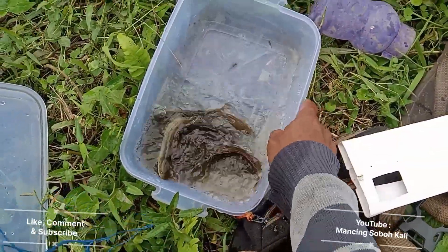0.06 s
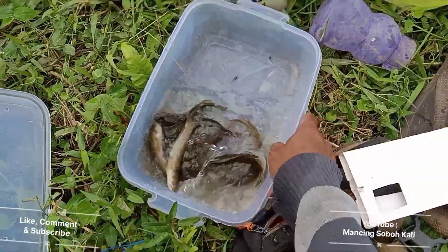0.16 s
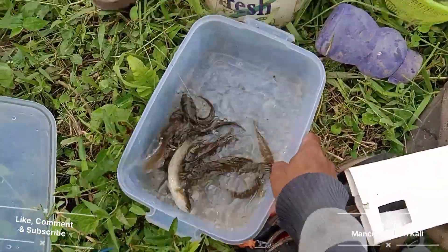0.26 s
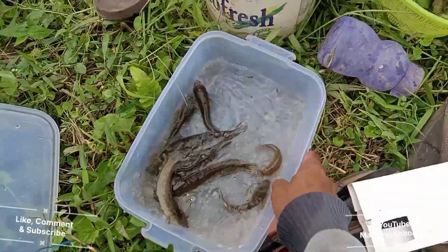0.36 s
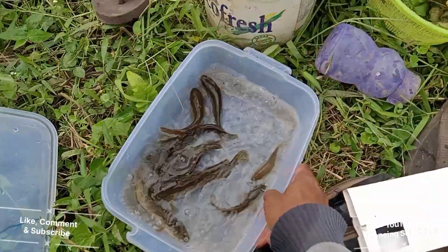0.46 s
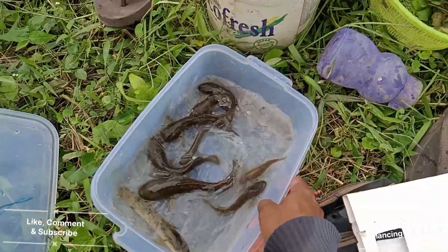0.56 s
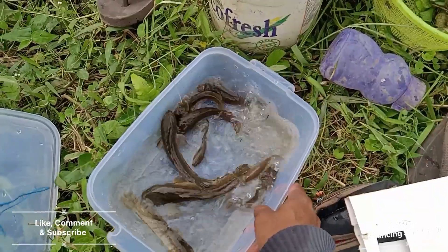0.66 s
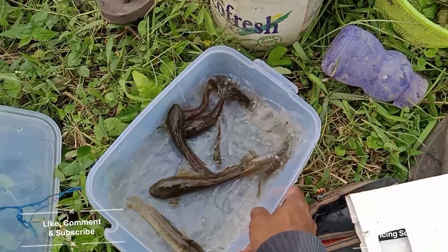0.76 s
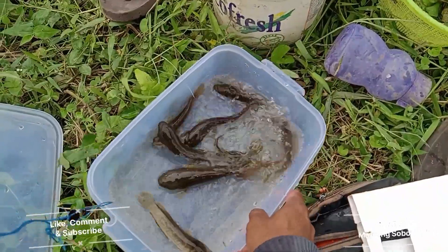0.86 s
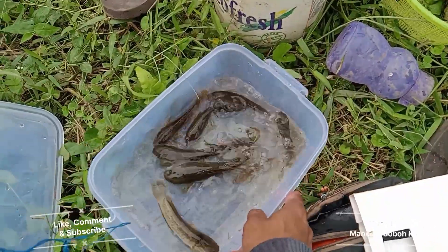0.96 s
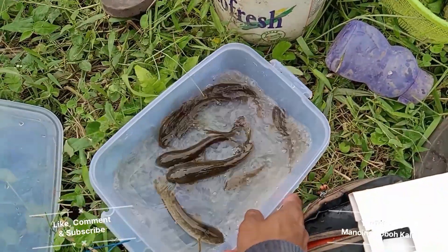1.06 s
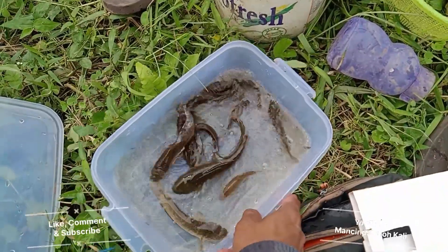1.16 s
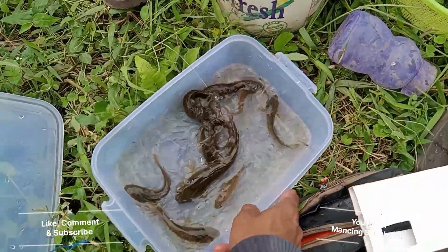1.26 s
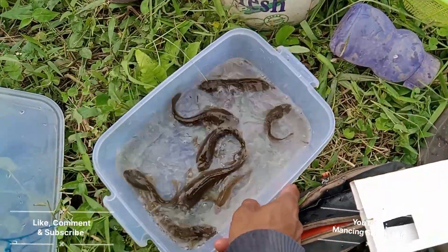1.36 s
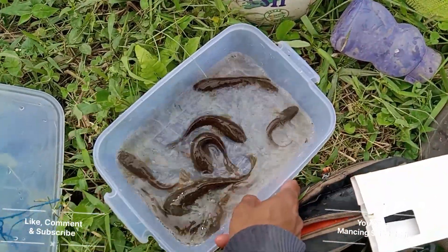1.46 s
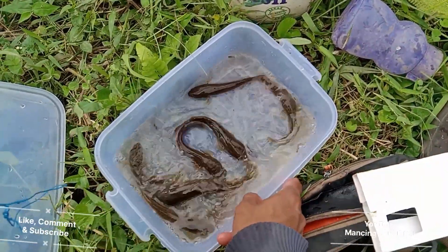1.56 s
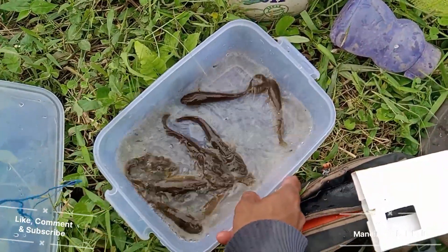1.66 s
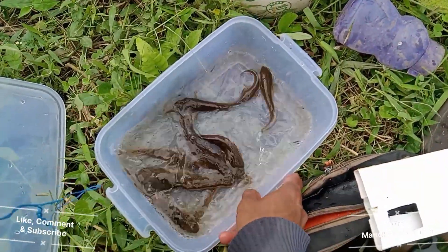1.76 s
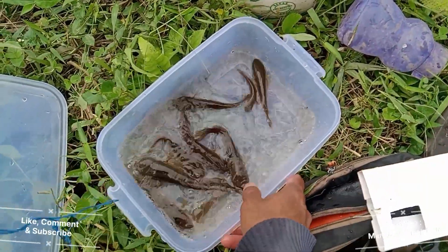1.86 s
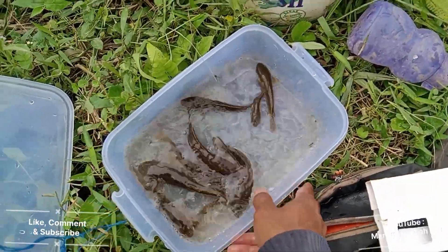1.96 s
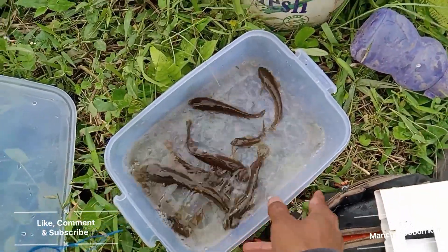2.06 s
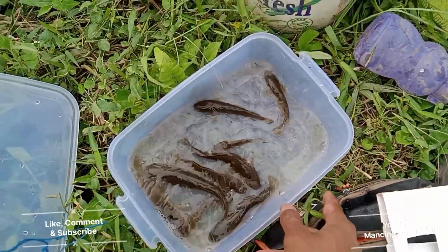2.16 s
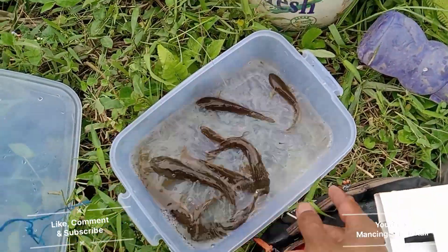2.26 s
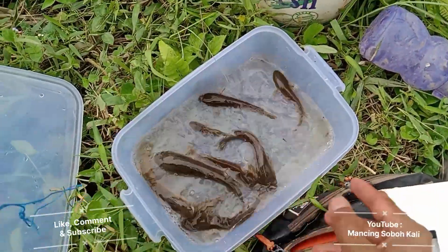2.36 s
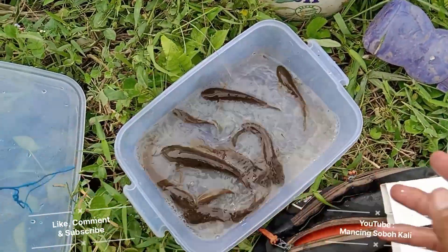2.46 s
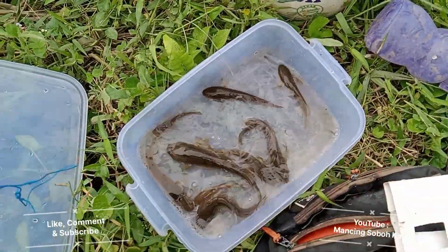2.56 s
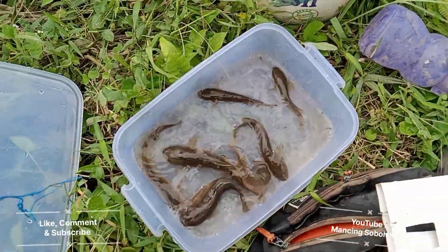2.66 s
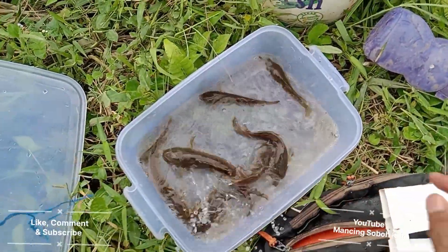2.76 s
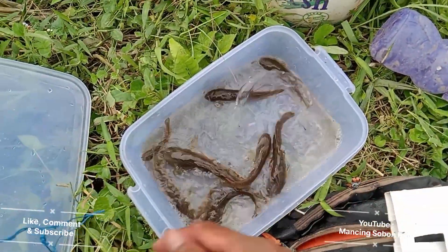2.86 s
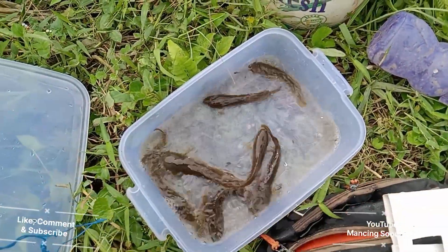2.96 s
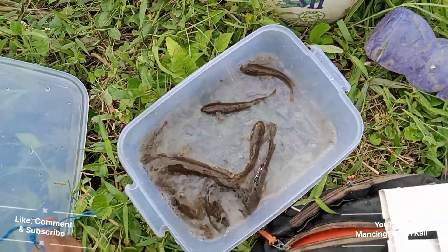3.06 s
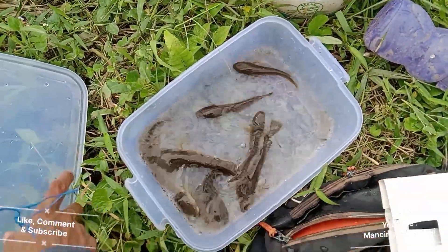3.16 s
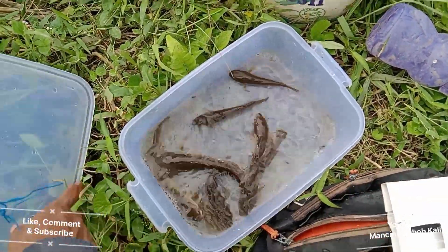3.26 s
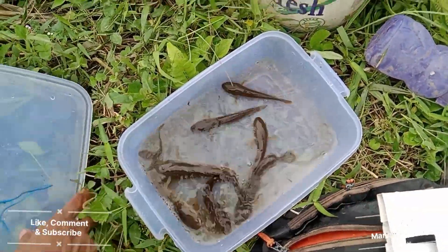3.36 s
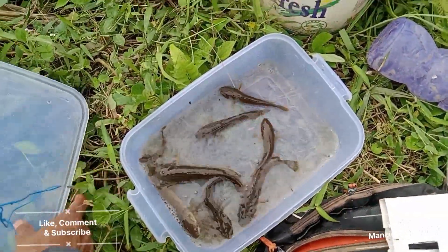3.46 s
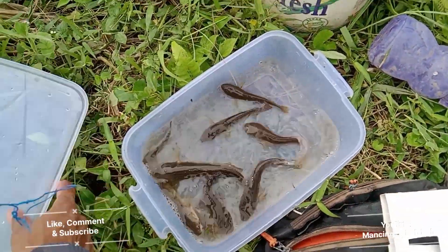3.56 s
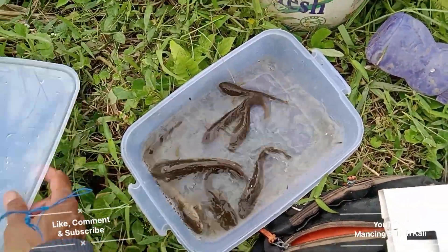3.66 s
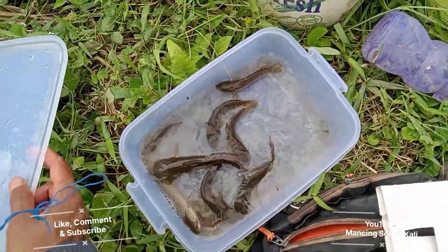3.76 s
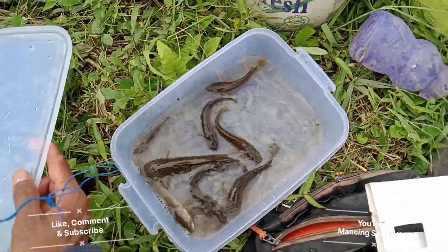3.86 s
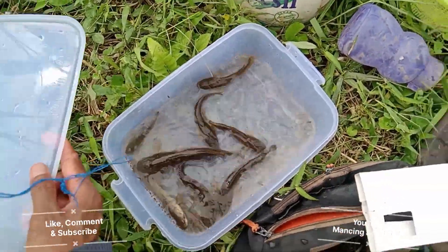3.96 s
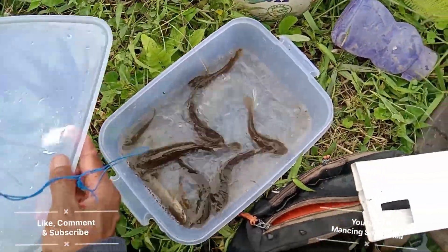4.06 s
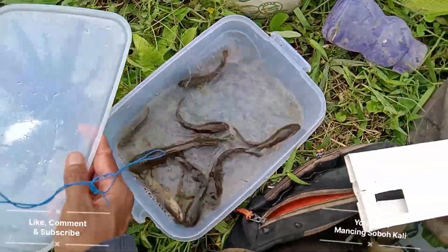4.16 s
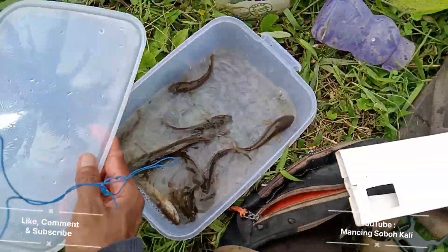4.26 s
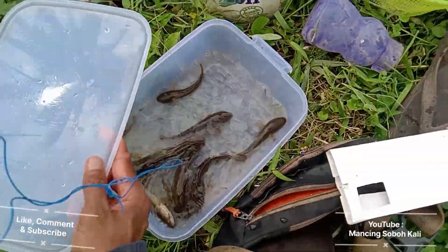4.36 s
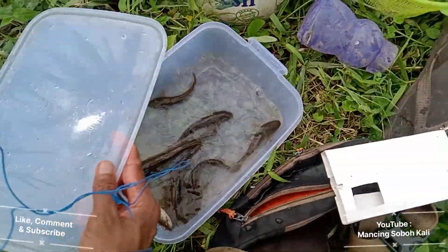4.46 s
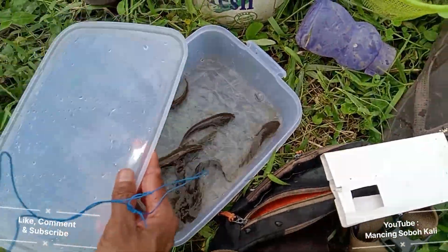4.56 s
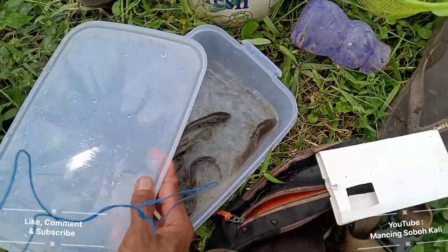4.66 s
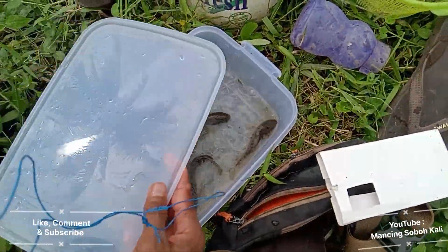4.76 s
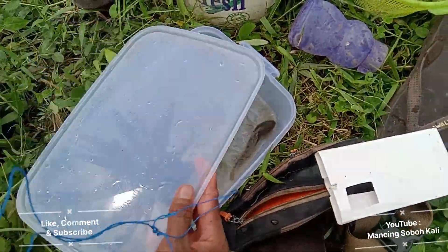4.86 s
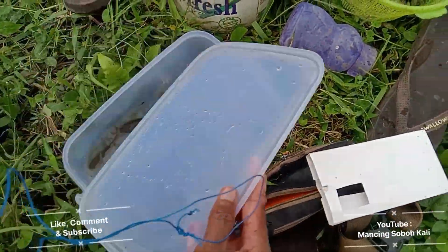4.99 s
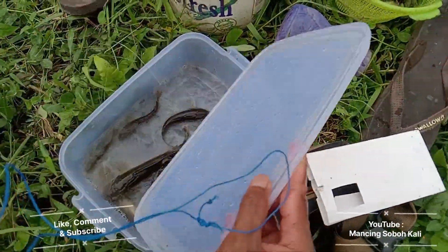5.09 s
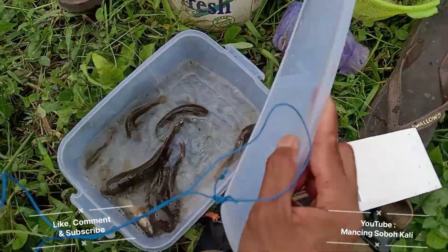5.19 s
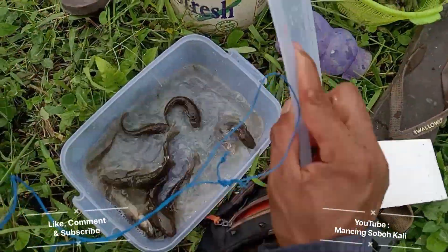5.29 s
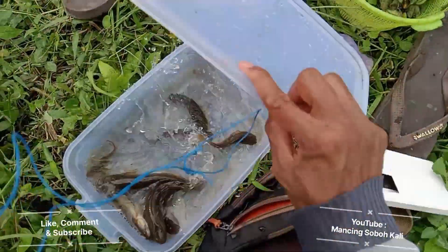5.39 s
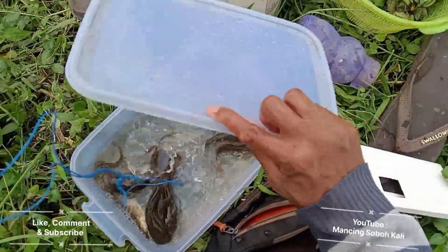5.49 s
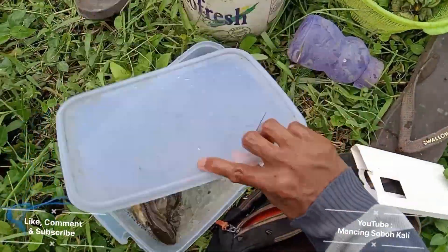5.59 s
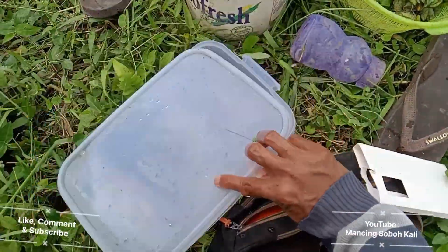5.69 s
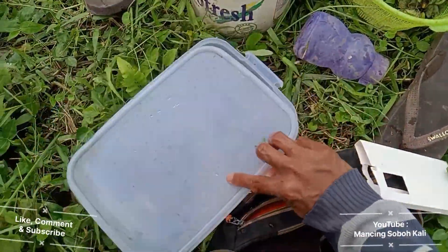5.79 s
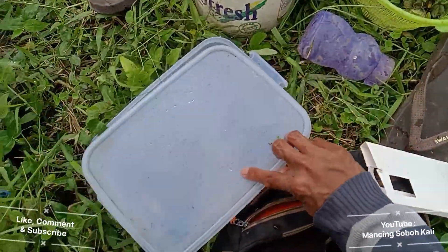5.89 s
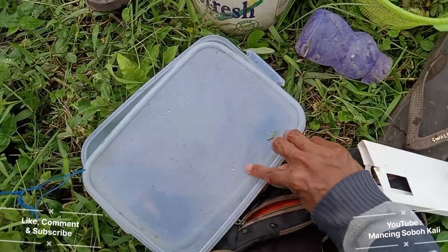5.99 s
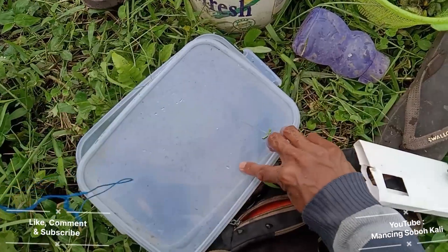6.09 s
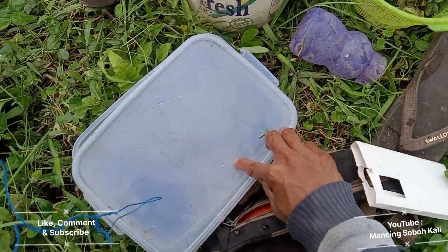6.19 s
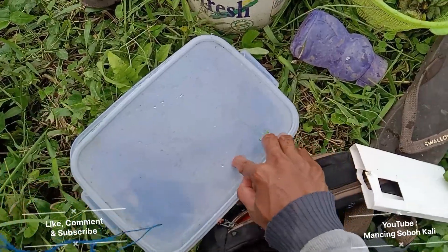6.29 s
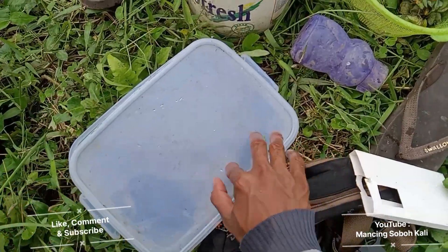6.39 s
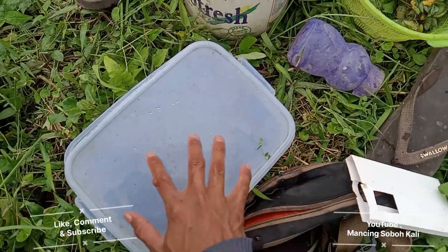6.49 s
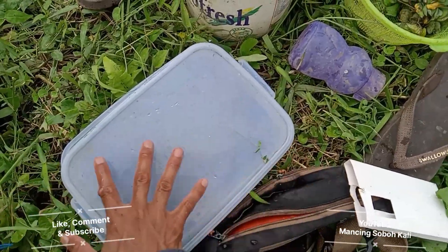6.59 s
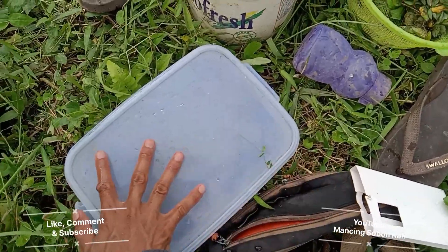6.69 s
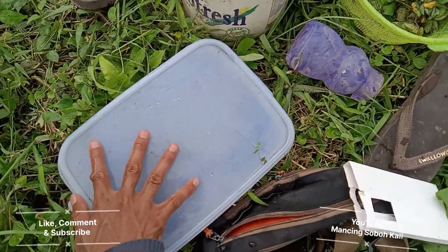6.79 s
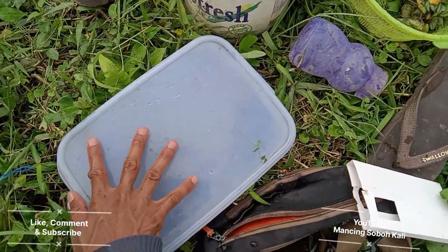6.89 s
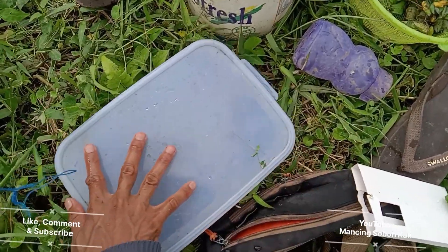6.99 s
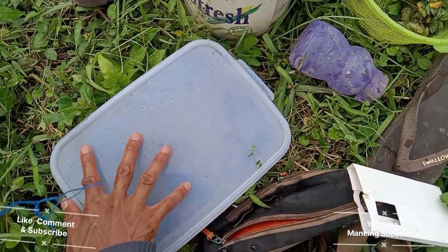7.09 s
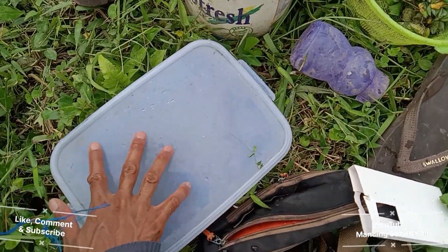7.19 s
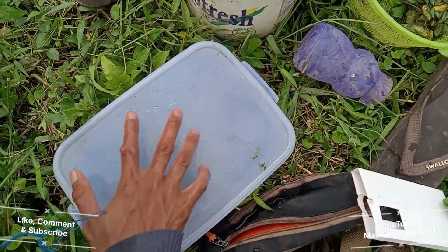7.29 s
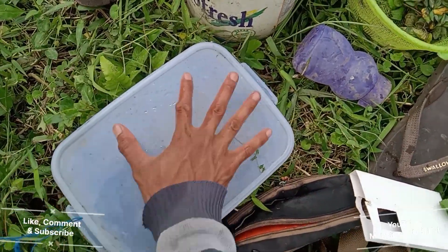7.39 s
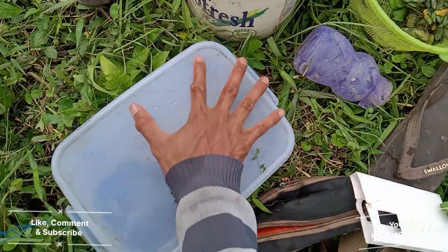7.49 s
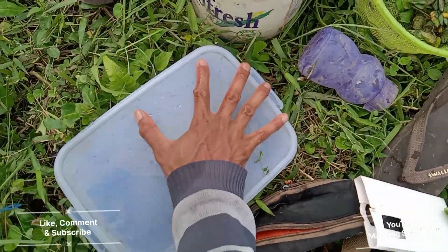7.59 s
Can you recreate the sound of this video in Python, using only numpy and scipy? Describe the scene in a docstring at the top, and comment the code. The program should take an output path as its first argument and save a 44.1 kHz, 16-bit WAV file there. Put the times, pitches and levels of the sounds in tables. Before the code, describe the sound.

Close up outdoors, small fish wriggle in shallow water in a plastic tub: bright drips, tail smacks and fizzing bubbles, busiest in the first second, then sparser. Plastic rubs softly as a lid is fetched. A splashy flurry leads into rapid hollow clacks, a very sharp snap, and a few dull presses, with the water now muffled. A steady soft outdoor hiss lies beneath.

```python
"""Small fish wriggle in shallow water in a plastic tub on the grass, heard from close by.
Their tails stir up clouds of ringing bubbles, smack the surface and throw drops; pushed water gurgles.
A hand fetches the lid, drops it on the rim, snaps it shut and presses it down: slipping plastic is
filtered noise, and each blow is a set of dying tones with a crack. Behind it all is an outdoor hiss,
made of shaped noise."""
import sys
import numpy as np
from scipy import signal
from scipy.io import wavfile
from scipy.ndimage import uniform_filter1d

SR = 44100
rng = np.random.default_rng(int(sys.argv[2]) if len(sys.argv) > 2 else 0)


def master(y):
    """Save y as 16-bit WAV."""
    cut = np.clip(np.atleast_2d(y).T, -1, 1)
    pcm = np.round(cut * 32767)  # scale
    wavfile.write(sys.argv[1], SR, pcm.astype(np.int16))


N = 336924  # length of the scene in samples

# outdoor noise, strength at each pitch before the humps: (frequency [Hz], level per Hz [dB])
AIR_SPECTRUM = [(25, -43), (50, -44), (90, -9), (140, 1.5), (210, -7.5), (330, 2), (700, 1), (1300, -1.5),
                (2200, -1.5), (4500, -9), (6400, -14), (8300, -9), (10000, -23.5), (13000, -16.5)]
# humps and hollows the tub gives the outdoor noise:
# (frequency [Hz], width [Hz], gain when open [dB], gain with the lid on [dB])
TUB_HUMPS = [(289, 97, 6.5, 7.5), (509, 71.6, -11, -9.5), (831, 20.4, 10.5, 12), (1407, 107, -8, -2.5),
             (2065, 75, 2, 4.5), (3180, 304, -13, -1), (3506, 220, 10, 4), (4300, 230, 4, 7),
             (5490, 230, 4, 7), (7960, 200, 4.5, 5.5), (9240, 73, 6, -3)]
# how strongly the outdoor noise varies in patches: (frequency [Hz], variation [dB])
AIR_PATCHINESS = [(1500, 2.7), (4000, 2.7)]
# loudness of the outdoor noise over time: (time [s], body level [dB], hiss level [dB])
AIR_LEVELS = [(0, -45.5, -51), (.6, -45.5, -50), (1.7, -45.5, -51), (3.3, -45.5, -50), (4.5, -44.5, -50.5),
              (5.8, -46, -49.5), (6.1, -46.5, -53.5), (6.22, -48.5, -56.5), (6.65, -49, -52.5),
              (7.64, -48.5, -55.5)]
# lid and tub dragged, flexed and rocked by the hand:
# (middle [s], length [s], level [dB], pitch [Hz])
PLASTIC_RUBS = [(0.154, 0.4, -48, 304), (2.829, 0.014, -38.5, 510), (3.286, 0.045, -41.5, 614),
                (3.351, 0.14, -40, 338), (4.017, 0.089, -45, 276), (4.217, 0.02, -39.5, 403),
                (4.366, 0.057, -36, 278), (4.721, 0.055, -39, 366), (4.782, 0.049, -40, 320),
                (5.426, 0.072, -46, 102), (5.462, 0.1, -45.5, 460), (5.665, 0.034, -44.5, 350),
                (5.783, 0.12, -44.5, 84), (6.043, 0.034, -35, 450), (6.235, 0.03, -42.5, 350),
                (6.342, 0.23, -41, 373), (6.881, 0.034, -41, 320), (6.946, 0.071, -41.5, 242),
                (6.95, .07, -47, 135), (7.133, 0.043, -41, 397), (7.359, .03, -45, 282),
                (7.63, .04, -42.5, 212), (7.631, 0.04, -33.5, 443)]
# blows on the lid: (time [s], thud level [dB], crack level [dB], factor on the lid's pitch [1],
# contact time [s], factor on the ring time [1])
LID_KNOCKS = [(5.7375, -16, -6.5, 1.3, 0.00015, 0.96), (5.7397, -15.5, -14, 1.1, 0.00006, 0.76),
              (5.7438, -12, -12, 1.19, 0.00015, 0.75), (5.7783, -6, -3.5, 1.11, 0.00058, 0.72),
              (5.7828, -8.5, -27, .96, 0.00052, 0.52), (5.8019, -16.5, -21, 0.82, 0.0004, 0.91),
              (6.016, -20, -48, 1.04, 0.0018, 1), (6.1400, -12, 6, 1.02, 0.00059, 0.57),
              (6.156, -25, -40, 1.55, 0.00048, 0.37), (6.1635, -23.5, -48, 1.04, .0008, 0.48),
              (6.177, -23, -56, 0.94, 0.001, 0.7), (6.824, -32.5, -45, 1.48, 0.0012, 0.73),
              (6.903, -13, -58, 0.79, 0.0027, 1), (6.925, -32, -43, 0.71, 0.00077, 0.93),
              (7.1457, -24, -22, 0.85, 0.001, 1), (7.157, -31, -35, 1.1, 0.0006, .9)]
# tones of the lid on the tub, before each blow's factors:
# (frequency [Hz], level [dB], time to fade by 60 dB [s])
LID_TONES = [(271, -17, 0.25), (352, -14.5, 0.14), (429, 0, 0.081), (471, -5, 0.074), (567, -12, 0.045),
             (680, -20, 0.058), (838, -6, 0.041), (968, -26, 0.25), (1380, -9.5, 0.056), (1680, -25, 0.21),
             (1950, -17, 0.069)]
# colour of the rim's sharp crack: (frequency [Hz], level per Hz [dB])
CRACK_SPECTRUM = [(100, -12), (500, 1.5), (1400, -25), (1900, -1), (3250, 1), (3700, -9), (4200, -4),
                  (4750, -12), (5300, -5.5), (6500, -7.5), (7200, -11.5), (8300, -15), (11000, -45)]
# the loudest single drops and bubbles: (time [s], level [dB], pitch [Hz])
LOUD_DROPS = [(.277, -35, 2300), (.303, -35, 3700), (.312, -34, 2420), (.319, -31, 2770), (.323, -35, 3620),
              (.358, -30.5, 3500), (.449, -33.5, 7640), (.639, -33.5, 2020), (0.6833, -23, 2900),
              (0.685, -20.5, 7800), (0.7043, -6, 2073), (0.71, -33, 2350), (.7578, -21.5, 6800),
              (.758, -20, 8200), (0.7655, -23, 5900), (.7655, -22, 7030), (0.773, -27, 2710),
              (0.801, -28.5, 2480), (.805, -26, 850), (.834, -29.5, 6660), (0.8865, -23.5, 5650),
              (0.929, -20, 3060), (0.9303, -17.5, 8010), (0.963, -27, 5300), (0.9778, -21.5, 2990),
              (1.034, -33, 3730), (1.052, -30.5, 3580), (2.822, -26, 6950), (2.937, -35, 1250),
              (3.047, -26, 3820), (3.0468, -31, 6000), (3.046, -28, 8300), (3.7891, -18.5, 890),
              (5.451, -19.5, 4460), (5.4797, -18, 8120), (5.554, -27.5, 2010), (5.587, -27, 2310),
              (5.604, -30, 3100), (5.604, -28, 8100), (5.627, -18.5, 2330), (5.631, -25, 1740),
              (5.644, -33, 4700), (5.6445, -28, 1660), (5.6757, -27, 3400), (5.686, -27, 3680),
              (5.696, -26, 3940), (5.700, -32, 3250), (5.704, -34, 4960), (5.712, -37, 6000),
              (5.721, -33, 6350), (5.7398, -15.5, 2350), (5.762, -25, 3080), (6.083, -28.5, 2930),
              (7.39, -28.5, 1490)]
# water pushed aside by a fish:
# (start [s], length [s], level [dB], first pitch [Hz], last pitch [Hz])
WATER_GURGLES = [(.718, 0.033, -40.5, 888, 900), (.72, 0.091, -47, 2770, 2580),
                 (0.791, 0.099, -41, 862, 980), (0.982, 0.053, -47, 1950, 2000),
                 (1.146, .11, -42.5, 1200, 910), (1.285, 0.074, -43, 1060, 980),
                 (2.245, 0.07, -44, 866, 885), (3.302, 0.16, -44.5, 784, 875),
                 (4.981, .05, -40.5, 1127, 1290), (5.586, 0.02, -40.5, 2350, 2460),
                 (5.624, 0.023, -39.5, 1940, 1570), (6.201, 0.033, -41.5, 810, 950)]
# tail flicks that smack the surface:
# (time [s], peak level [dB], middle pitch [Hz], pitch spread [octaves])
TAIL_SMACKS = [(0.6858, -19, 6560, 0.27), (0.703, -25.5, 4030, 0.75), (0.734, -28, 1800, 1),
               (.801, -36, 3000, 0.62), (.9285, -28, 6000, 0.77), (0.984, -21, 2500, 1.06),
               (2.821, -28, 6100, 0.27), (2.8253, -20.5, 7160, 0.41), (2.870, -31, 7460, 0.25),
               (3.789, -36, 2200, 0.56), (3.8322, -25, 4170, .6), (4.884, -32.5, 6000, .6),
               (4.955, -42, 1490, 0.48), (4.999, -37, 1290, .4), (5.012, -41, 1300, .4),
               (5.529, -28, 5900, 0.41), (5.552, -31, 7500, 0.34), (5.587, -43, 4980, .6),
               (5.638, -28, 6000, 0.6)]
# tail strokes, each a cloud of tiny bubbles:
# (middle [s], length [s], level [dB], middle pitch [Hz], pitch spread [octaves])
TAIL_STROKES = [(0.326, 0.1, -47, 3000, 0.31), (.362, 0.023, -43.5, 7330, 0.36),
                (0.453, 0.021, -49, 5600, 0.93), (0.681, 0.057, -47, 5800, 0.59),
                (0.745, 0.025, -46, 1690, 0.52), (0.778, 0.1, -45.5, 7170, 0.28),
                (.775, .12, -47, 2910, 1.05), (0.985, 0.055, -43.5, 3840, 0.9),
                (1.389, 0.16, -49.5, 5220, 0.69), (2.835, 0.036, -44, 7670, 0.53),
                (2.881, 0.27, -50.5, 1585, 0.46), (3.042, 0.015, -42, 5400, 1),
                (3.283, 0.14, -48, 4250, .4), (3.272, 0.35, -55, 1800, 0.61), (3.667, .08, -50, 3660, 1.12),
                (3.758, 0.057, -46, 7700, 0.53), (3.852, 0.04, -44, 1436, 0.5),
                (3.971, 0.029, -46, 3880, 0.16), (4.364, 0.05, -39, 736, 0.21),
                (4.372, 0.019, -43, 3800, 0.83), (4.607, 0.017, -43, 5310, 0.72),
                (5.112, 0.021, -45, 4500, 0.3), (5.179, 0.013, -43, 3580, 0.076),
                (5.449, 0.012, -33.5, 5600, 0.44), (5.48, 0.016, -30, 6300, 1.06),
                (5.628, 0.0084, -26, 2690, 0.37), (5.651, 0.053, -41, 3500, 0.91),
                (5.708, 0.089, -40, 4740, 0.79), (5.665, .06, -45, 2700, 1.1),
                (5.705, 0.073, -48, 2520, 1.36), (6.082, 0.053, -47, 1740, 0.55),
                (6.29, .04, -50, 1896, .4), (7.14, 0.023, -41, 2240, 0.76), (7.399, 0.085, -48, 1510, 0.26),
                (7.628, 0.038, -42.5, 2320, 0.79)]
# how the microphone loses treble: (frequency [Hz], gain [dB])
MICROPHONE_TREBLE = [(8300, -2.5), (8800, -3), (9500, -5.5), (10500, -15), (12000, -25), (15000, -35)]

EDGE_HZ = 15800  # upper limit of the sound
# low bubbles ring longest: fade time at 1 kHz, and the power of pitch by which it shrinks
RING_S, RING_FALL = 0.022, 0.58
FINEST_HZ = 10600  # bubbles pitched above this get faint
COVERED_S, SEALED_S = 5.74, 6.14  # the lid lands on the rim, then snaps tight


def amp(db):
    """Turns decibels into a plain multiplier."""
    return 10 ** (np.asarray(db) / 20)


def unit(x):
    """Scales a sound to an average (rms) strength of 1."""
    return x / np.sqrt(np.mean(x ** 2) + 1e-20)


def read(points, hz):
    """Reads a table between its points, with frequency spaced like musical pitch."""
    f, value = np.transpose(points)
    return np.interp(np.log(hz + 1), np.log(f), value)


def add(mix, s, sound):
    """Mixes a sound in from time s."""
    part = mix[max(round(s * SR), 0):][:len(sound)]
    part += sound[:len(part)]


def swell(count):
    """Half a sine wave: rises from silence and sinks back."""
    return np.sin(np.linspace(0, np.pi, count))


def colour(x, points, size=2048):
    """Filters a sound to the given spectrum, with no echo ahead of the sound."""
    hz = abs(np.fft.fftfreq(size, 1 / SR))
    log_gain = np.log(amp(read(points, hz)))
    response = np.exp(np.conj(signal.hilbert(log_gain)))
    taps = np.fft.ifft(response).real
    return signal.oaconvolve(x, taps[:size // 2])[:len(x)]


def high_pass(hz, order):
    """Sections of a smooth filter that removes the bass."""
    return signal.butter(order, hz, "high", fs=SR, output="sos")


def bubble(hz, t60, glide, onset_cycles):
    """A pocket of air rings and dies, its pitch drifting up as it nears the surface."""
    t = np.arange(0, t60, 1 / SR)
    turns = hz * t * (1 + glide * t / t60)
    onset = 1 - np.exp(-turns / onset_cycles)
    fade = amp(-60 * (t / t60) ** 1.71)
    return onset * fade * np.sin(2 * np.pi * turns)


def cloud(length, count, hz, spread, cycles, size_db, rise=0):
    """Many bubbles of random time, pitch, size and ring; rise moves their pitch, in octaves."""
    out = np.zeros(round(length * SR))
    for when, pitch, size, ring in rng.random((count, 4)):
        # most pitches fall near the middle one, a few stray far
        stray = np.log((pitch + 1e-6) / (1 - pitch)) / 2
        f = np.clip(hz * 2 ** (rise * when + spread * stray), 200, SR / 3)
        pop = bubble(f, cycles * (.5 + ring) / f, glide=0.058, onset_cycles=0.73)
        weight = np.sqrt(f / hz) / (1 + (f / FINEST_HZ) ** 7)
        # a few bubbles are much louder than the rest
        loudness = amp(size_db * min(-np.log(1 - size), 4))
        add(out, when * length, loudness * weight * pop)
    return unit(out)


def air():
    """Patchy outdoor noise in many narrow bands; its colour changes as the lid covers the tub."""
    hop = 256
    hz = np.fft.rfftfreq(1024, 1 / SR)
    t = np.arange(N // hop + 5)[:, None] * hop / SR
    real, imag, patches = rng.standard_normal((3, len(t), len(hz)))
    # smooth the patches over time, then over frequency
    patches = uniform_filter1d(patches, size=9, axis=0)
    patches = unit(uniform_filter1d(patches, size=8, axis=1))
    covered = t > COVERED_S
    humps_db = 0
    for f, width, opened, shut in TUB_HUMPS:
        humps_db = humps_db + np.where(covered, shut, opened) * np.exp(-.5 * ((hz - f) / width) ** 2)
    patches_db = read(AIR_PATCHINESS, hz) * patches
    noise = (real + 1j * imag) * amp(read(AIR_SPECTRUM, hz) + humps_db + patches_db)
    # body below about 2.5 kHz, hiss above, each with its own loudness
    low = 1 / (1 + (hz / 2500) ** 8)
    s, *levels = np.transpose(AIR_LEVELS)
    out = np.zeros(N)
    for band, level in zip((low, 1 - low), levels):
        sound = signal.istft((noise * band).T, nperseg=1024, noverlap=hop * 3)[1][:N]
        out += amp(np.interp(np.arange(N) / SR, s, level)) * unit(sound)
    return out


def tub(x, t60=0.06, wet_db=-5.5):
    """The tub's close walls add a very short tail of echoes, made of fading noise."""
    t = np.arange(SR // 8) / SR
    tail = rng.standard_normal(len(t)) * amp(-60 * t / t60) * (t > .0015)
    return x + amp(wet_db) * signal.oaconvolve(x, tail / np.linalg.norm(tail))[:N]


def rubs(width=0.31, scrape_db=-21):
    """Fast tiny slips, made of noise, set a wall of plastic humming around one pitch."""
    out = np.zeros(N)
    for s, length, db, hz in PLASTIC_RUBS:
        slips = rng.standard_normal(SR // 2)
        b, a = signal.iirpeak(hz, 1 / width, fs=SR)
        hum = signal.lfilter(b, a, signal.lfilter(b, a, slips))
        scrape = amp(scrape_db) * unit(colour(slips, CRACK_SPECTRUM))
        rub = (unit(hum) + scrape)[-round(length * SR):]
        # the table's level is the peak of an equally strong sine wave
        add(out, s - length / 2, amp(db) * unit(rub * swell(len(rub))) / np.sqrt(2))
    return out


def knocks(rattle_db=-29.02, rattle_t60=0.062, lowest_hz=285, crack_softening=0.044,
           ground_db=-44, ground_hz=84, ground_t60=0.07, sag=0.13, sag_s=0.03):
    """A blow rings the lid, duller if soft; flexed plastic relaxes, so pitch sags; the rim cracks."""
    out, t = np.zeros(N), np.arange(SR // 4) / SR
    click = signal.unit_impulse(len(t))
    click_peak = abs(colour(click, CRACK_SPECTRUM)).max()
    # a clock that slows down makes every tone sag
    slack_t = np.cumsum(1 - sag * (1 - np.exp(-t / sag_s))) / SR
    # the tub nods on the soft ground
    ground = amp(ground_db - 60 * t / ground_t60) * np.sin(2 * np.pi * ground_hz * t)
    for s, thud_db, crack_db, pitch, contact, ring in LID_KNOCKS:
        thud = np.zeros(len(t))
        for hz, db, t60 in LID_TONES:
            # the hand damps the ring; a longer contact weakens the high tones
            fade = amp(db - 60 * t / (t60 * ring))
            thud += fade * np.sin(2 * np.pi * hz * pitch * slack_t) / (1 + (hz * contact) ** 2)
        thud *= 1 - np.exp(-t / contact)
        rattle = amp(rattle_db - 60 * t / rattle_t60) * rng.standard_normal(len(t))
        crack = colour(click + rattle, CRACK_SPECTRUM) / click_peak
        # a longer contact also softens the crack
        lag = np.exp(-1 / (SR * contact * crack_softening))
        crack = signal.lfilter([(1 - lag) ** 2], [1, -2 * lag, lag ** 2], crack)
        # so small a lid gives off almost no bass
        blow = amp(thud_db) * thud + amp(crack_db) * crack
        blow = signal.sosfilt(high_pass(lowest_hz, order=3), blow)
        add(out, s, blow + amp(thud_db) * ground)
    return out


def patter(start_s=0.54, length_s=0.42, level_db=-55):
    """Fine droplets fall back into the tub early on, each ringing a small bubble."""
    out = np.zeros(N)
    droplets = cloud(length_s, count=220, hz=5250, spread=0.63, cycles=160, size_db=2)
    add(out, start_s, amp(level_db) * droplets)
    return out


def simmer(simmer_db=-55, lapping_db=-53.0, shut_db=-8, restless_db=4.0):
    """Fine bubbles simmer in fits and starts over low lapping ones; sealing the lid turns both down."""
    fine = cloud(N / SR, count=11000, hz=3550, spread=0.75, cycles=55, size_db=3.3)
    wander = unit(uniform_filter1d(rng.standard_normal(N), size=1800))
    fits = amp(restless_db * np.clip(wander, -2, 2))
    lapping = cloud(N / SR, count=1100, hz=1248.6, spread=0.438, cycles=41, size_db=3.5)
    water = amp(simmer_db) * fine * unit(fits) + amp(lapping_db) * lapping
    return water * amp(shut_db * (np.arange(N) / SR > SEALED_S))


def drops(spatter_db=-17, spatter_t60=0.014):
    """Each drop traps one ringing bubble and scatters a few finer droplets."""
    out = np.zeros(N)
    for s, db, hz in LOUD_DROPS:
        ring = RING_S * (hz / 1000) ** -RING_FALL
        add(out, s, amp(db) * bubble(hz, ring, glide=0.01, onset_cycles=1.6))
        spatter = cloud(0.023, count=24, hz=4530, spread=.9, cycles=24, size_db=1)
        t = np.arange(len(spatter)) / SR
        add(out, s - .001, amp(db + spatter_db - 60 * t / spatter_t60) * spatter)
    return out


def gurgles(spread=0.097, cycles=26):
    """A run of like-sized bubbles glides in pitch as the pocket of water changes shape."""
    out = np.zeros(N)
    for s, length, db, first_hz, last_hz in WATER_GURGLES:
        rise = np.log2(last_hz / first_hz)
        run = cloud(length, count=120, hz=first_hz, spread=spread, cycles=cycles, size_db=1, rise=rise)
        add(out, s, amp(db) * run * np.sqrt(abs(swell(len(run)))))
    return out


def smacks(fade_t60=0.019):
    """A tail breaks the surface: a sudden burst of very brief bubble pops."""
    out = np.zeros(N)
    for s, db, hz, spread in TAIL_SMACKS:
        burst = cloud(.015, count=60, hz=hz, spread=spread, cycles=7, size_db=2)
        burst = burst * amp(-60 * np.arange(len(burst)) / SR / fade_t60)
        add(out, s, amp(db) * burst / abs(burst).max())
    return out


def strokes():
    """Tails churn the water in short swells, each a crowd of tiny ringing bubbles."""
    out = np.zeros(N)
    for s, length, db, hz, spread in TAIL_STROKES:
        churn = cloud(length, count=200, hz=hz, spread=spread, cycles=34, size_db=4.8)
        add(out, s - length / 2, amp(db) * churn * swell(len(churn)))
    return out


def scene():
    """Background, lid and water reach both channels alike."""
    water = patter() + simmer() + drops() + gurgles() + smacks() + strokes()
    mono = air() + rubs() + knocks() + tub(water)
    return np.array([mono, mono])


def record(dry):
    """The microphone dulls the treble, then a steep filter removes everything above the edge."""
    dull = np.array([colour(channel, MICROPHONE_TREBLE) for channel in dry])
    band_limit = signal.firwin(511, EDGE_HZ, window=("kaiser", 9), fs=SR)
    return signal.oaconvolve(dull, band_limit[None], "same")


dry = scene()
out = record(dry)
master(out)
```